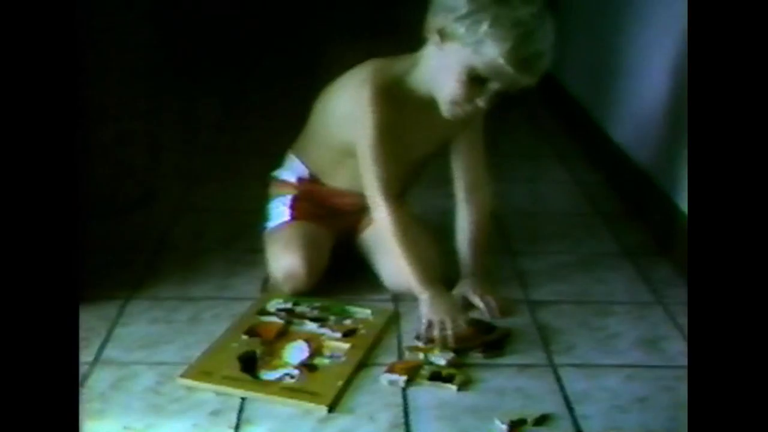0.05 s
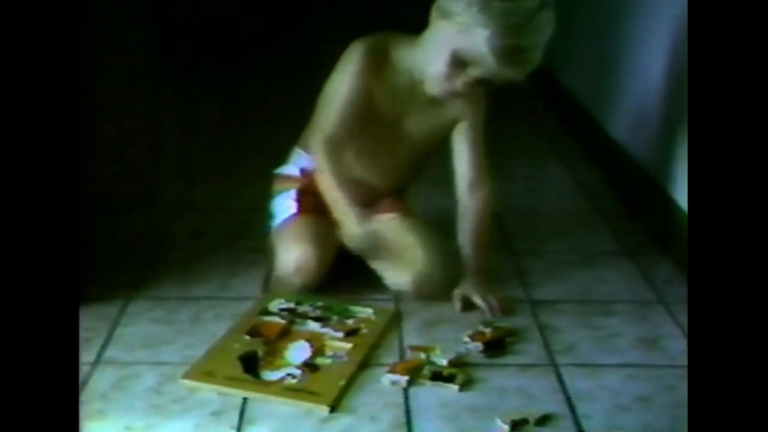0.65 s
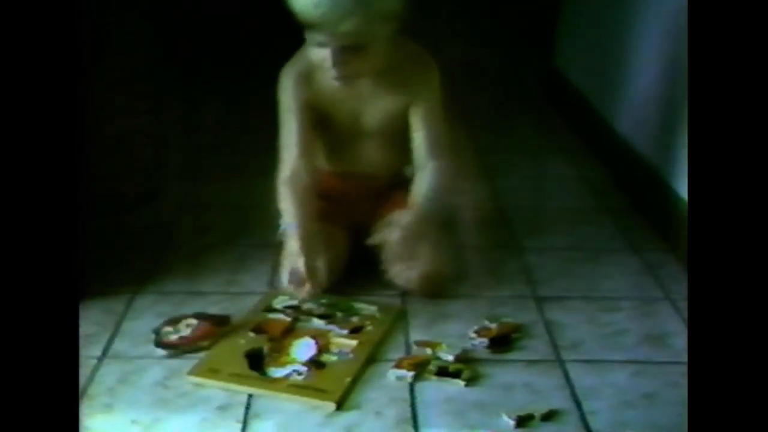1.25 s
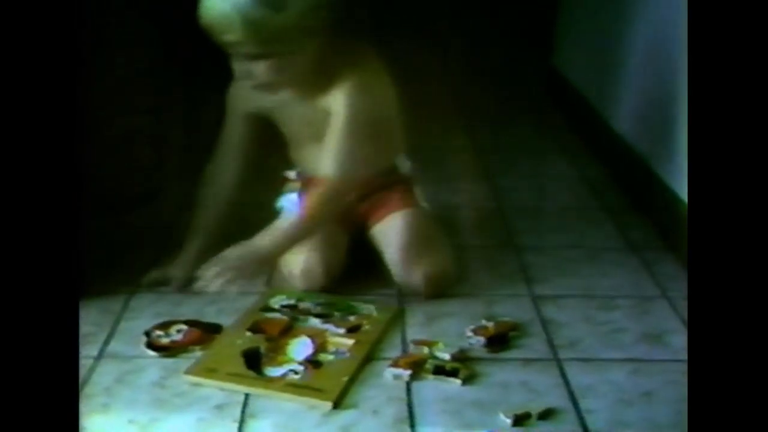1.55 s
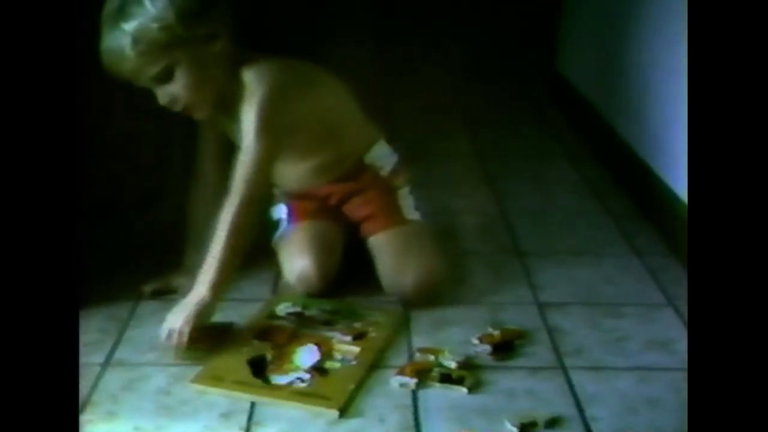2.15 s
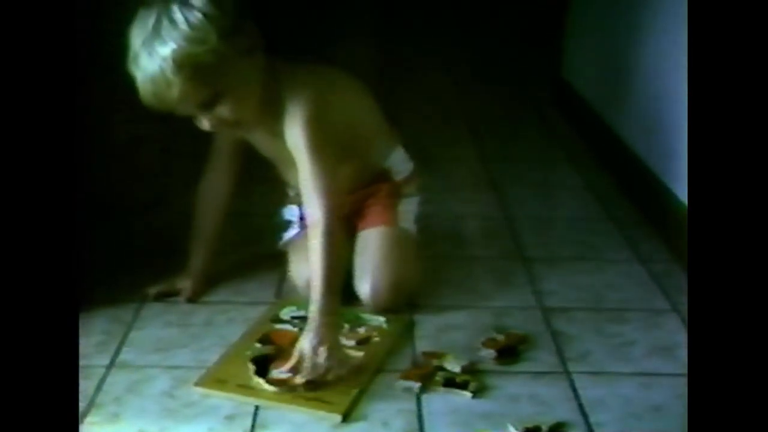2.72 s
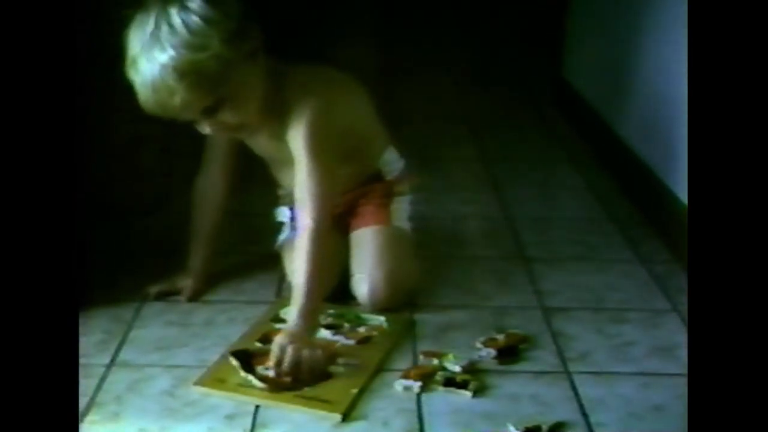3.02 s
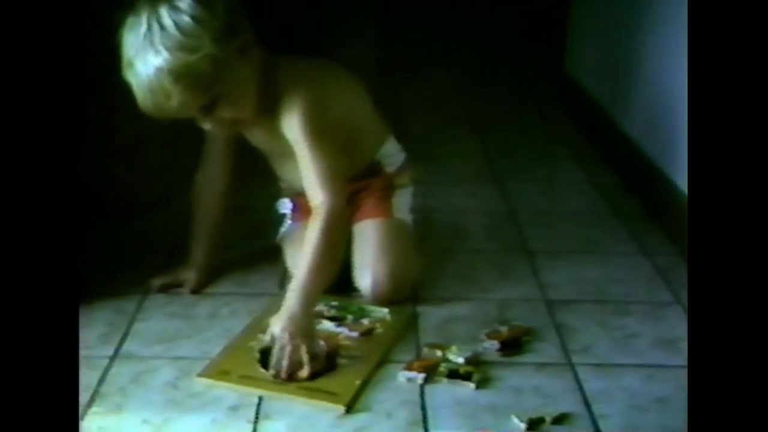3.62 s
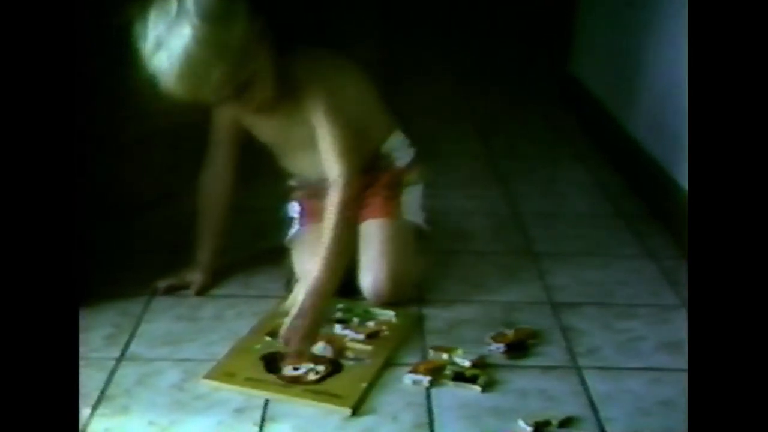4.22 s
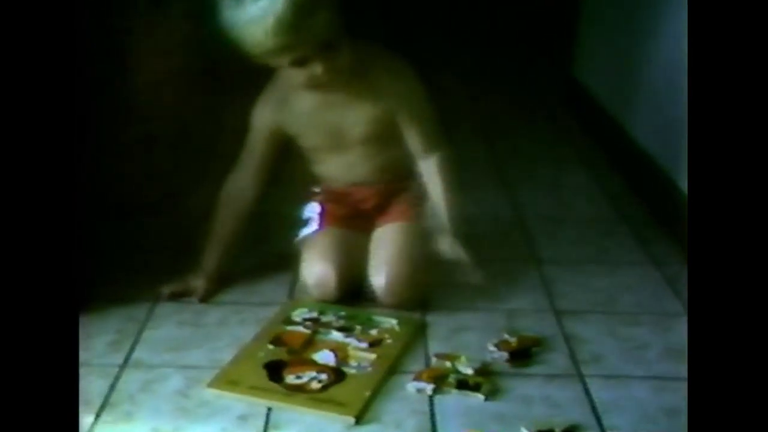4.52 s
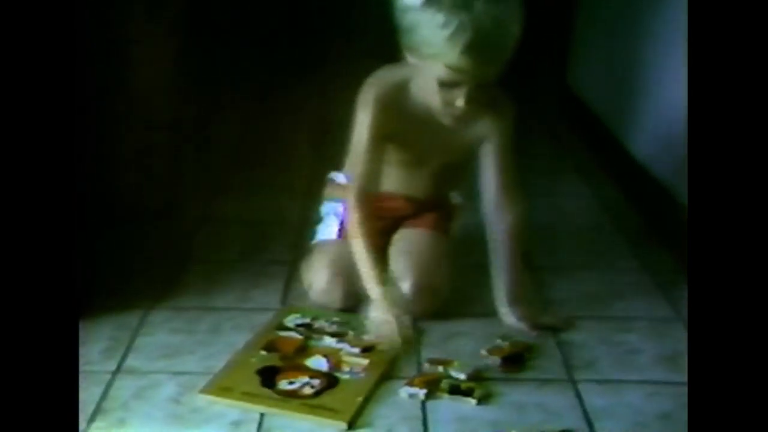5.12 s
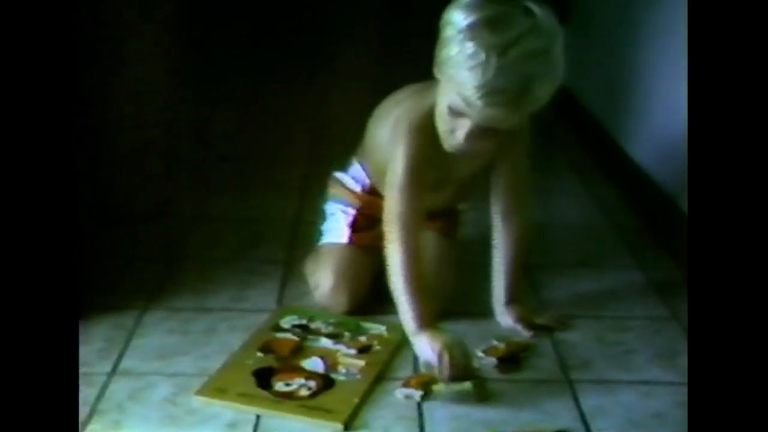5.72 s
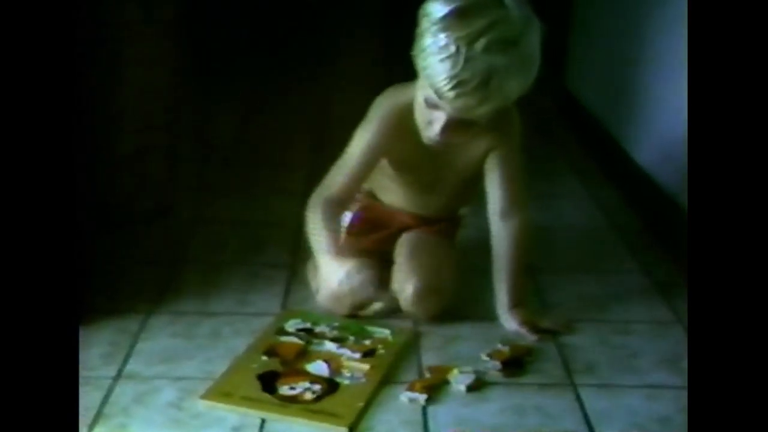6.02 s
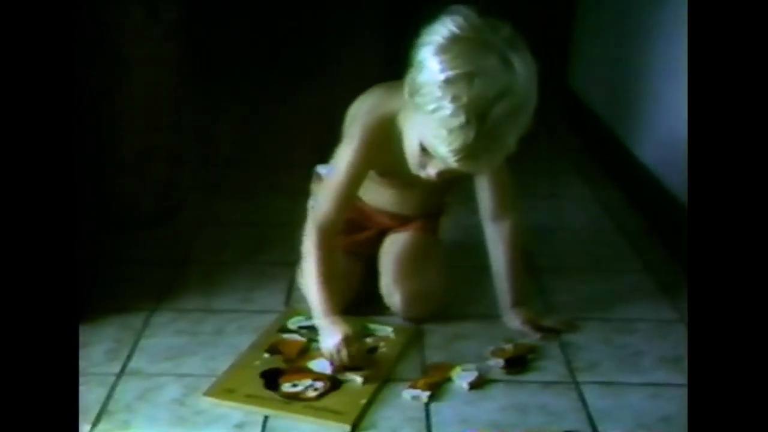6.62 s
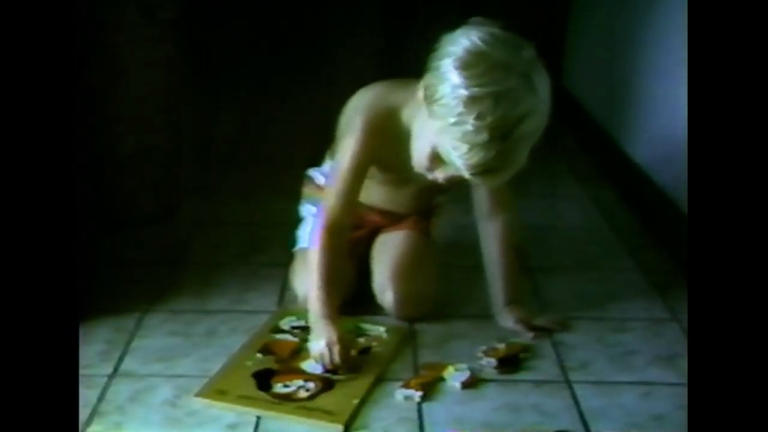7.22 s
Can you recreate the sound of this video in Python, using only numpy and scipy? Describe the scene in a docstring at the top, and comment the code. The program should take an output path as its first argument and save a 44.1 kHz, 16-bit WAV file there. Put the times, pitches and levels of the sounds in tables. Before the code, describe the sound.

Wooden puzzle pieces clatter on a tiled floor and click into their board in a small room, with soft tape motor whir.

```python
"""A round wooden puzzle piece drops on a tiled floor, bounces and rattles to rest, ringing.
A child lays it on the board and slides it into its hole; a small piece follows. Each contact is a
knock, an edge click and a few ringing modes; rubbing is a train of tiny slips. The place is a small,
live room, with the camcorder's microphone near enough for the direct sound to lead the reflections.
Right at the microphone, the camcorder adds its tape motor's hum and ticking, hiss and a thin whistle."""
import sys
import numpy as np
from scipy import signal
from scipy.fft import next_fast_len
from scipy.io import wavfile

SR = 44100
rng = np.random.default_rng(int(sys.argv[2]) if len(sys.argv) > 2 else 0)


def bounce(signal):
    """Save signal as a 16-bit WAV file at the path given by the first command-line argument."""
    frames = np.transpose(np.atleast_2d(signal))
    limited = np.clip(frames, -1, 1)
    pcm = np.round(limited * 32767).astype(np.int16)
    wavfile.write(sys.argv[1], SR, pcm)


N = 320166

# tape motor hum: multiple of the head drum's turning rate, relative_db
HUM_PARTIALS = [(1.5, -75), (2, -66), (3, -68), (4, -73), (5, -77.5), (6, -82), (8, -88), (12, -69.5),
                (15, -83), (20, -81)]
# spectra of the motor's ticks and of the hiss: frequency_hz, relative_db
TICK_SPECTRUM = [(800, -32), (2100, -3.5), (2700, -15), (4100, -5), (5400, -4.5), (6000, -0.5), (7400, 0.5),
                 (8900, -3), (10000, -6.5), (12000, -12.5), (15500, -8.5)]
HISS_SPECTRUM = [(18, 16.5), (35, 3), (100, 12), (230, 8.5), (400, 7), (800, 4), (1500, 1.5), (3500, -2),
                 (5000, -0.5), (6200, 2.5), (7800, 1.5), (10000, -1.5), (13000, -4), (15700, -7.5)]
# close tones of the line scan: pitch_hz, relative_db
WHISTLE_TONES = [(15730.4, -73), (15734.3, -60.5), (15747.3, -64.5)]

# fingers nudge the round piece on the tiles: start_s, knock_db, hardness_db_per_octave
NUDGES = [(.159, -53, -5.5), (.215, -66, 3), (.497, -66, 2)]
# it drops and bounces, ever sooner: start_s, knock_db, ring_db, edge_db, second_rim_delay_s
BOUNCES = [(1.0983, -27.5, -29.5, -47.5, .009), (1.225, -31, -28.5, -45, .011),
           (1.316, -34.5, -28, -53, .0155), (1.368, -48, -31.5, -63, 0.0088)]
# later taps, in order of play: start_s, knock_db, hardness_db_per_octave
ROUND_ON_BOARD = [(2.07, -49, -4), (2.696, -45.5, -5), (2.725, -46.5, 0.5), (2.748, -48, -5),
                  (2.788, -28.5, 1.5), (2.822, -42, 0.5), (2.843, -45, 5), (3.004, -40.5, 4.5),
                  (3.016, -51, 0), (3.203, -48, -0.5), (3.256, -41.5, 0.5), (3.692, -42.5, -2),
                  (3.724, -52.5, -5.5), (3.796, -47, -1.5), (4.199, -60, -7)]  # taken up, laid down, pressed home
SMALL_ON_TILE = [(5.773, -58, 1), (5.829, -46.5, 7), (5.866, -53.5, 5), (5.89, -61, 5)]  # picked up
SMALL_ON_BOARD = [(6.297, -58, -6), (6.47, -35, 5.5), (6.474, -38, 2), (6.499, -48, 9.5), (6.911, -46.5, 0),
                  (6.943, -46, 0.5), (6.958, -45, 4.5), (6.963, -37, 2.5)]  # set down, pushed home

# modes of the pieces: pitch_hz, relative_db, t60_s
ROUND_TILE_MODES = [(1724, -13.5, 0.089), (2086, 3.5, 0.068), (2230, -18, 0.054), (2300, -18, 0.071),
                    (3400, -35, 0.083), (4350, -27.5, 0.049)]
ROUND_HIGH_MODES = [(3470, -2, 0.08), (4500, -6, 0.065), (5430, 4, 0.088)]
ROUND_BOARD_MODES = [(1350, -11, 0.12), (1690, 12.5, 0.03), (1700, -1, 0.098), (2170, -5, 0.025)]
SMALL_TILE_MODES = [(1095, -6, 0.045), (1720, -2, 0.043), (3260, 1, 0.051), (3400, -8, 0.055),
                    (5800, -4, 0.076)]
SMALL_BOARD_MODES = [(1180, -2, 0.045), (1347, 4, 0.034), (2425, 3, 0.02), (2770, -5, 0.037)]
# dense, quickly damped resonances under each kind of knock: frequency_hz, relative_db
TILE_KNOCK = [(100, -26), (220, -15.5), (500, -2.5), (780, -2), (1000, 0.5), (1280, 2), (1450, 0),
              (1640, 4.5), (1900, -0.5), (2300, 0.5), (2800, -11.5), (3300, -21.5), (3550, -19.5),
              (4000, -43.5)]
BOARD_KNOCK = [(100, -32), (250, -18), (450, -4), (720, -4.5), (1100, 0), (1380, 2), (1650, -8.5),
               (2000, 0), (2350, -4), (2850, -11), (3150, -16), (3550, -20), (4000, -41)]
SMALL_KNOCK = [(100, -16), (280, -18), (500, -2.5), (750, 0.5), (930, -2), (1250, -1), (1550, -5),
               (1850, 1.5), (2150, -5), (2500, -6), (2900, -4.5), (3300, -14), (3900, -28)]
# upper resonances that a hard edge wakes: frequency_hz, relative_db
ROUND_EDGE = [(2800, -6.5), (3550, -3), (4100, -15), (4500, -12), (5100, -3), (5480, -2), (5900, -9),
              (6400, -7), (7200, -27), (10000, -40)]
BOARD_EDGE = [(2300, -19), (2850, 8), (3150, -3), (3550, 3), (4050, -16), (4800, -2), (5400, -2), (6100, 2),
              (7200, -14), (10000, -37)]
SMALL_EDGE = [(2700, -6.5), (3300, -15), (3900, -16), (4750, 0), (5100, -2), (5450, 4), (5820, -4),
              (6200, -3), (6600, -2), (7500, -26), (10000, -37)]
# decay of the small room: frequency_hz, t60_s
ROOM_DECAY = [(250, 0.3), (660, 0.53), (1740, 0.47), (4600, 0.65), (9000, 0.36)]

# rubbing strokes: peak_s, level_db, rise_s, fall_s
SCUFFS = [(1.095, -57, 0.062, 0.011), (1.785, -59, 0.077, .085), (1.885, -60, 0.023, .03),
          (6.31, -58.5, .035, 0.021), (6.365, -60.5, 0.023, 0.027)]  # palm or fingertips on tile and board
DRAGS = [(1.113, -39, 0.0067, 0.17), (2.23, -65.5, 0.089, .08), (2.735, -49.5, .04, 0.036),
         (2.79, -45, .025, 0.018), (6.76, -63, 0.18, .09), (6.935, -45.5, 0.031, .1)]  # pieces over tile and board
SLIDES = [(2.95, -54, .055, 0.11), (3.005, -45.5, 0.033, 0.023), (3.183, -40, 0.076, 0.082)]  # the round piece into its hole
# the dull spectrum of skin on tile: frequency_hz, relative_db
SKIN_SPECTRUM = [(150, -19), (350, -1), (520, 3.5), (800, -0.5), (1250, -4.5), (1800, -10), (3000, -24)]
# weight shifting on the floor: start_s, level_db
FLOOR_BUMPS = [(1.41, -48.5), (3.842, -50), (4.434, -55.5), (5.43, -56), (6.31, -54), (6.351, -49.5),
               (7.115, -51)]

DRUM_HZ = 59.94  # turning rate of the head drum
TIME_S = np.arange(N) / SR


def gain_of(db):
    """Decibels to amplitude."""
    return 10 ** (np.asarray(db) / 20)


def unit_rms(x):
    """Scales to an rms of one."""
    return x / np.sqrt(np.mean(x ** 2) + 1e-20)


def at_level(x, db):
    """Sets the rms level of a sound's first 9 ms."""
    return gain_of(db) * x / np.sqrt(np.mean(x[:400] ** 2) + 1e-20)


def curve_at(points, hz):
    """Reads a table on a logarithmic frequency axis."""
    point_hz, value = np.transpose(points)
    return np.interp(np.log(hz + 1), np.log(point_hz + 1), value)


def coloured(x, spectrum, tilt_db=0):
    """Causal filter with the given spectrum, tilted by tilt_db per octave from 400 to 3500 Hz."""
    size = next_fast_len(len(x) + 4096)
    hz = abs(np.fft.fftfreq(size, 1 / SR))
    octaves = np.log2(np.clip(hz, 400, 3500) / 1500)
    rolloff_db = -30 * np.log2(np.maximum(hz / spectrum[-1][0], 1))
    log_gain = np.log(gain_of(curve_at(spectrum, hz) + tilt_db * octaves + rolloff_db))
    minimum_phase = np.exp(np.conj(signal.hilbert(log_gain)))
    return np.fft.ifft(np.fft.fft(x, size) * minimum_phase).real[:len(x)]


def narrow_band(x, hz, width_hz):
    """Two passes through one resonance, scaled to an rms of one."""
    radius = np.exp(-np.pi * width_hz / SR)
    for _ in range(2):
        x = 2 * signal.lfilter([1 - radius], [1, -radius * np.exp(2j * np.pi * hz / SR)], x).real
    return unit_rms(x)


def add(mix, start_s, sound):
    """Mixes a sound in at a time."""
    part = mix[round(start_s * SR):][:len(sound)]
    part += sound[:len(part)]


def motor_hum(gain_db):
    """The head drum hums at multiples of its turning rate, right by the microphone."""
    hum = sum(gain_of(db) * np.sin(2 * np.pi * (multiple * DRUM_HZ * TIME_S + rng.random()))
              for multiple, db in HUM_PARTIALS)
    return gain_of(gain_db) * np.sqrt(2) * hum


def motor_ticks(level_db, spread_db, head_db, head_offset_turns):
    """The coils switch eight times a turn with alternating sign; the heads add one tick a turn."""
    steps = np.arange(int(N / SR * DRUM_HZ * 8))
    head_turns = steps[::8] / 8 + head_offset_turns
    turns = np.concatenate([steps / 8, head_turns])
    sizes = np.concatenate([(-1.) ** steps, np.full(len(head_turns), gain_of(head_db))])
    sizes *= gain_of(spread_db * rng.standard_normal(len(turns)))
    centres = turns[:, None] / DRUM_HZ * SR
    samples = centres.astype(int) + np.arange(-8, 9)
    pulses = sizes[:, None] * np.sinc(samples - centres)  # ticks fall between samples
    ticks = np.bincount(np.clip(samples, 0, N).ravel(), pulses.ravel(), N + 1)[:N]
    return gain_of(level_db) * unit_rms(coloured(ticks, TICK_SPECTRUM))


def low_hum(level_db, beat_s, loudest_s, depth):
    """A hum at the drum's turning rate waxes and wanes in a slow beat."""
    beat = 1 + depth * np.cos(2 * np.pi * (TIME_S - loudest_s) / beat_s)
    return gain_of(level_db) * beat * np.sqrt(2) * np.sin(2 * np.pi * DRUM_HZ * TIME_S)


def hiss(level_db, case_db, case_hz, case_width_hz):
    """Steady hiss, with a narrow band ringing in the camcorder's case."""
    wide = unit_rms(coloured(rng.standard_normal(N), HISS_SPECTRUM))
    case = narrow_band(rng.standard_normal(N), case_hz, case_width_hz)
    return gain_of(level_db) * wide + gain_of(case_db) * case


def whistle(gain_db, beat_s, silent_s):
    """The line scan's close tones flutter against each other and fall silent once in each slow beat."""
    tones = sum(gain_of(db) * np.sin(2 * np.pi * (hz * TIME_S + rng.random()))
                for hz, db in WHISTLE_TONES)
    return gain_of(gain_db) * tones * np.sin(np.pi * (TIME_S - silent_s) / beat_s)


def taps(rows, ring_share_db, edge_share_db):
    """Contact rows whose ring and edge click follow the knock; harder taps click more."""
    click_per_hardness = 1.36
    return [(s, db, hardness, db + ring_share_db, db + edge_share_db + click_per_hardness * hardness)
            for s, db, hardness in rows]


def ringing(t, modes):
    """A struck piece's decaying modes, each starting at a phase of its own."""
    ring = sum(gain_of(db - 60 * t / t60) * np.sin(2 * np.pi * (hz * t + rng.random()))
               for hz, db, t60 in modes)
    return ring * (1 - np.exp(-t / 0.001))


def burst(t, rise_s, t60_s):
    """A blow scattered at once by the wood and the floor around it."""
    return rng.standard_normal(len(t)) * (1 - np.exp(-t / rise_s)) * gain_of(-60 * t / t60_s)


def contacts(rows, knock, edge, modes, rise_s, knock_t60_s, edge_t60_s, choke_t60_s):
    """Each contact gives a knock, an edge click and a ring that the next contact chokes."""
    out, t = np.zeros(N), np.arange(SR // 5) / SR
    gaps_s = np.diff([row[0] for row in rows], append=N / SR)
    for (start_s, knock_db, hardness, ring_db, edge_db), gap_s in zip(rows, gaps_s):
        choke = gain_of(-60 * np.maximum(t - gap_s, 0) / choke_t60_s)
        add(out, start_s, at_level(ringing(t, modes) * choke, ring_db))
        add(out, start_s, at_level(coloured(burst(t, rise_s, knock_t60_s), knock, hardness), knock_db))
        add(out, start_s, at_level(coloured(burst(t, rise_s, edge_t60_s), edge), edge_db))
    return out


def shimmer(rows, share_db):
    """Edge blows on the tiles leave the round piece's high modes ringing."""
    out, t = np.zeros(N), np.arange(SR // 4) / SR
    for start_s, *_, edge_db in rows:
        add(out, start_s, at_level(ringing(t, ROUND_HIGH_MODES), edge_db + share_db))
    return out


def room(x, gap_s, build_s):
    """Sparse reflections build up at the microphone, each band dying at its own speed."""
    reflections = rng.choice([-1., 1.], SR) * (rng.random(SR) < 3000 / SR)
    reflections *= np.clip((np.arange(SR) / SR - gap_s) / build_s, 0, 1)
    hz, t, bands = signal.stft(reflections, SR, nperseg=256)
    decay = gain_of(-60 * t / curve_at(ROOM_DECAY, hz)[:, None])
    tail = signal.istft(bands * decay, SR, nperseg=256)[1]
    return signal.fftconvolve(x, tail / np.linalg.norm(tail))[:N]


def slips(per_s, spread_db):
    """Friction: a dense random train of tiny slips of uneven size."""
    sizes = rng.choice([-1., 1.], N) * gain_of(spread_db * rng.uniform(-1.2, 1, N))
    return sizes * (rng.random(N) < per_s / SR)


def strokes(rows):
    """Each rubbing stroke swells and fades, 19 dB down one rise or fall time from its peak."""
    envelope = np.zeros(N)
    for peak_s, db, rise_s, fall_s in rows:
        from_peak = np.maximum((peak_s - TIME_S) / rise_s, (TIME_S - peak_s) / fall_s)
        envelope += gain_of(db - 19 * np.clip(from_peak, 0, 10) ** 1.4)
    return envelope


def rubbing(ring_share_db, ring_hz, ring_width_hz, tilt_db):
    """Slips shake board and tile; the sliding round piece sings at its main mode; skin only brushes."""
    grain = slips(per_s=1500, spread_db=7.5)
    board = unit_rms(coloured(grain, BOARD_KNOCK, tilt_db))
    sliding = unit_rms(board + gain_of(ring_share_db) * narrow_band(grain, ring_hz, ring_width_hz))
    dragging = unit_rms(coloured(grain, TILE_KNOCK, tilt_db))
    brushing = unit_rms(coloured(rng.standard_normal(N), SKIN_SPECTRUM))
    return sliding * strokes(SLIDES) + dragging * strokes(DRAGS) + brushing * strokes(SCUFFS)


def bounces(harder_per_s, second_rim_db, still_after_s, still_db):
    """Three contacts a bounce: one rim, a softer knock on the other, a touch that stills the ring."""
    rows = []
    for start_s, knock_db, ring_db, edge_db, rock_s in BOUNCES:
        hardness = -1.75 + harder_per_s * (start_s - BOUNCES[0][0])  # the first landing is dull
        first_rim = (knock_db, ring_db - 2.5, edge_db)
        second_rim = np.array([knock_db + second_rim_db, ring_db, edge_db + second_rim_db])
        landings = [(0, first_rim), (rock_s, second_rim), (rock_s + still_after_s, second_rim + still_db)]
        for delay_s, (knock, ring, edge) in landings:
            rows.append((start_s + delay_s, knock, hardness, ring, edge))
    return rows


def rattle(count, start_s, rock_s, peak_s, rise_db_per_s, fall_db_per_s):
    """Nearly flat, the piece rocks from rim to rim in an even run of ever harder contacts."""
    def swell_db(s):
        """Rises to the peak and dies away."""
        return np.minimum(rise_db_per_s * (s - peak_s), fall_db_per_s * (peak_s - s))
    age_s = rock_s * np.arange(count)
    times_s = start_s + age_s
    knock_db = -39 - 65 * age_s
    hardness = 1.4 + 150 * age_s
    ring_db = -34 + swell_db(times_s - rock_s)  # one contact behind the clicks
    edge_db = -41 + swell_db(times_s)
    return list(zip(times_s, knock_db, hardness, ring_db, edge_db))


def floor_bumps(pitch_hz, t60_s, rise_s):
    """Shifting weight rings one low mode, at a slightly different pitch each time."""
    out, t = np.zeros(N), np.arange(SR // 4) / SR
    envelope = (1 - np.exp(-t / rise_s)) * gain_of(-60 * t / t60_s)
    for start_s, db in FLOOR_BUMPS:
        tone = np.sin(2 * np.pi * pitch_hz * rng.normal(1, 0.062) * t)
        add(out, start_s, gain_of(db) * envelope / envelope.max() * tone)
    return out


def lying_loose(rows, from_s, to_s, boost_db):
    """The round piece rings louder while no hand or hole holds it."""
    return [(s, knock_db, hardness, ring_db + boost_db * (from_s < s < to_s), edge_db)
            for s, knock_db, hardness, ring_db, edge_db in rows]


def scene():
    """One microphone, on both channels, hears the puzzle, the room and the camcorder's own noise."""
    round_on_tile = taps(NUDGES, ring_share_db=7, edge_share_db=-14)
    round_on_tile += bounces(harder_per_s=28, second_rim_db=-10.5, still_after_s=0.018, still_db=-10)
    round_on_tile += rattle(count=8, start_s=1.39, rock_s=0.0103, peak_s=1.412,
                            rise_db_per_s=600, fall_db_per_s=263)
    round_on_board = taps(ROUND_ON_BOARD, ring_share_db=-12, edge_share_db=-20)
    round_on_board = lying_loose(round_on_board, from_s=2.9, to_s=3.5, boost_db=10)
    small_on_tile = taps(SMALL_ON_TILE, ring_share_db=-4, edge_share_db=-12.5)
    small_on_board = taps(SMALL_ON_BOARD, ring_share_db=-8, edge_share_db=-17)
    dropped = contacts(round_on_tile, TILE_KNOCK, ROUND_EDGE, ROUND_TILE_MODES,
                       rise_s=0.00034, knock_t60_s=0.047, edge_t60_s=0.057, choke_t60_s=0.013)
    seated = contacts(round_on_board, BOARD_KNOCK, BOARD_EDGE, ROUND_BOARD_MODES,
                      rise_s=0.00056, knock_t60_s=0.057, edge_t60_s=0.04, choke_t60_s=0.026)
    picked = contacts(small_on_tile, SMALL_KNOCK, SMALL_EDGE, SMALL_TILE_MODES,
                      rise_s=0.00087, knock_t60_s=0.04, edge_t60_s=0.04, choke_t60_s=0.04)
    placed = contacts(small_on_board, SMALL_KNOCK, SMALL_EDGE, SMALL_BOARD_MODES,
                      rise_s=0.0013, knock_t60_s=0.06, edge_t60_s=0.025, choke_t60_s=0.035)
    rubbed = rubbing(ring_share_db=3, ring_hz=1670, ring_width_hz=220, tilt_db=-0.5)
    direct = dropped + shimmer(round_on_tile, share_db=-12) + seated + picked + placed + rubbed
    play = direct + gain_of(-7) * room(direct, gap_s=0.0035, build_s=0.0073)
    play += floor_bumps(pitch_hz=226, t60_s=0.12, rise_s=0.0059)
    camcorder = motor_hum(gain_db=-1.3)
    camcorder += motor_ticks(level_db=-62, spread_db=2.5, head_db=3.5, head_offset_turns=0.57)
    camcorder += low_hum(level_db=-72, beat_s=9.2, loudest_s=1.3, depth=0.56)
    camcorder += hiss(level_db=-58, case_db=-65, case_hz=7103, case_width_hz=180)
    camcorder += whistle(gain_db=0.5, beat_s=3.4, silent_s=3.35)
    return np.array([play + camcorder, play + camcorder])


def record(dry):
    """The camcorder's band limit, just above the whistle."""
    lowpass = signal.firwin(1023, cutoff=15850, window=("kaiser", 9), fs=SR)
    return signal.oaconvolve(dry, lowpass[None], "same")


dry = scene()
out = record(dry)
bounce(out)
```